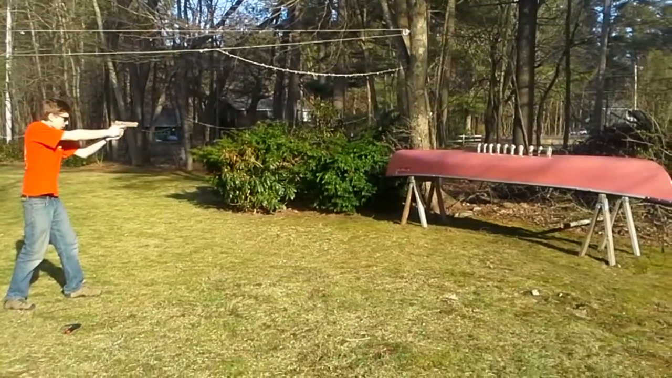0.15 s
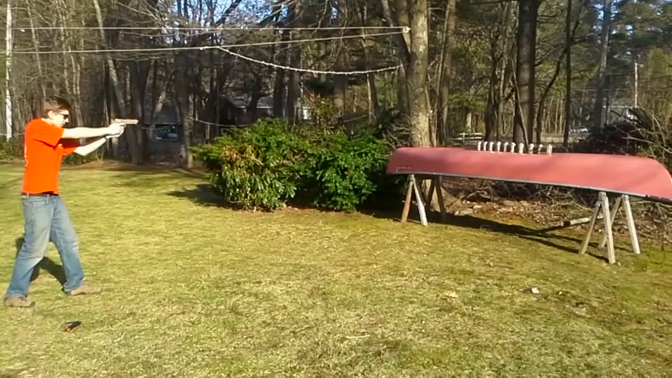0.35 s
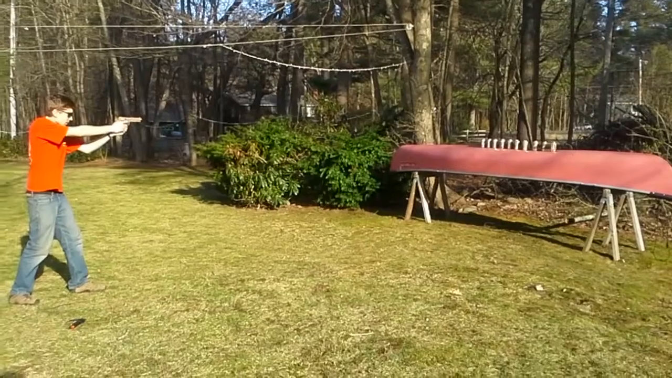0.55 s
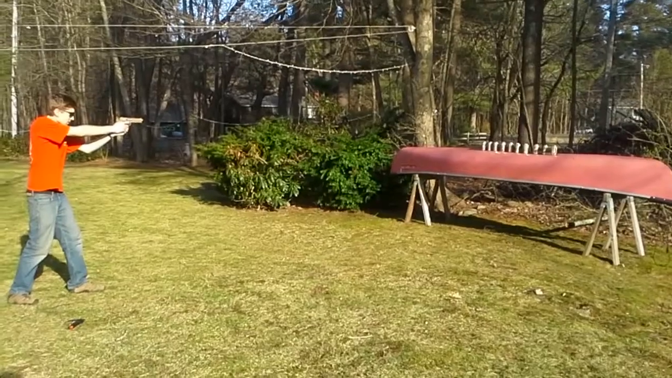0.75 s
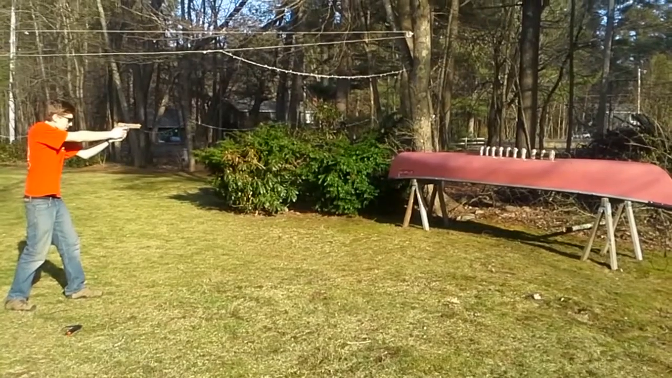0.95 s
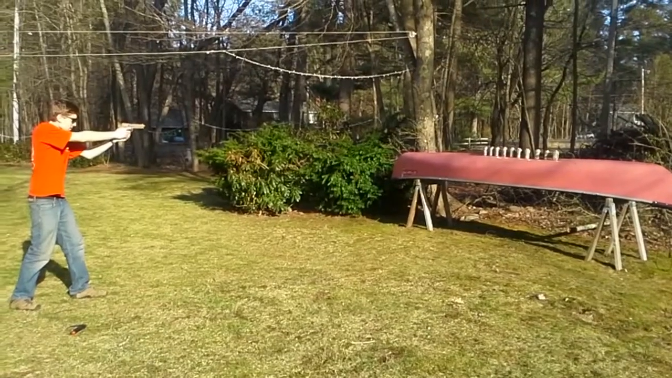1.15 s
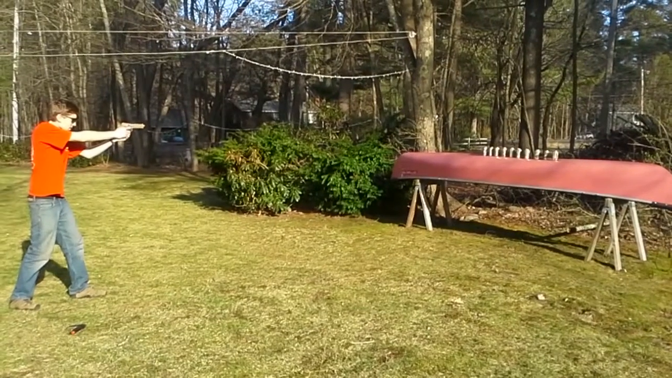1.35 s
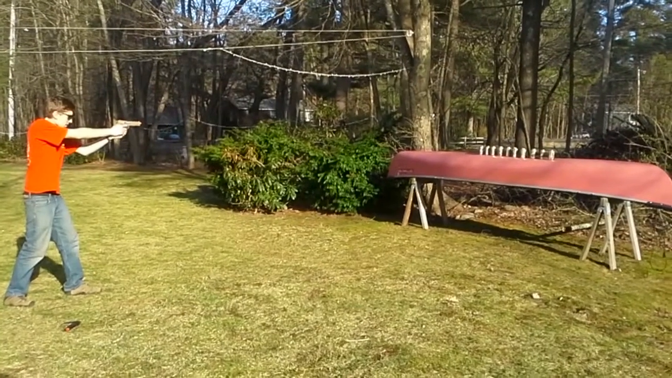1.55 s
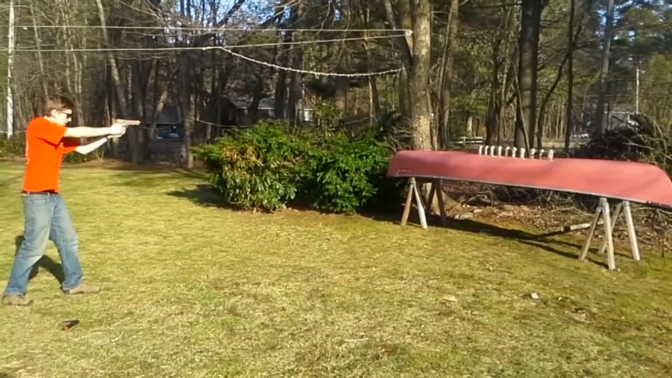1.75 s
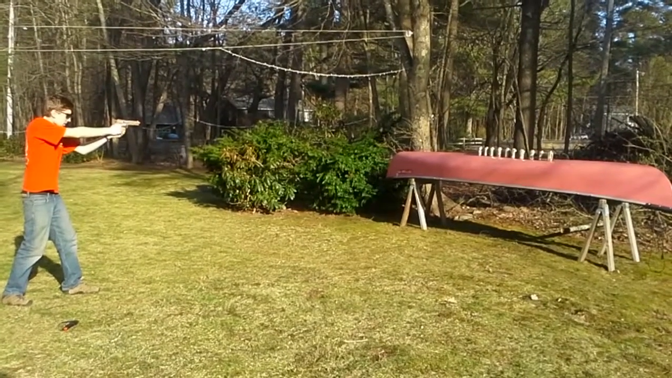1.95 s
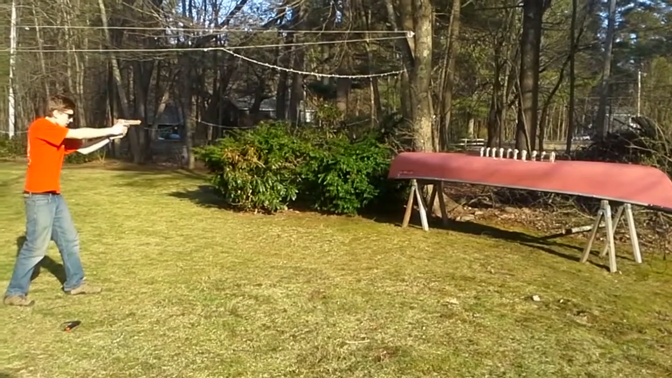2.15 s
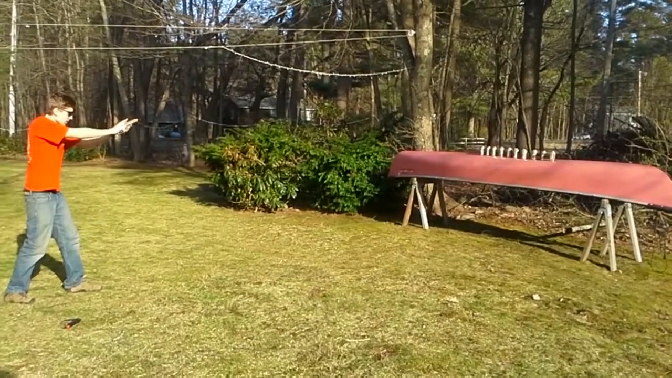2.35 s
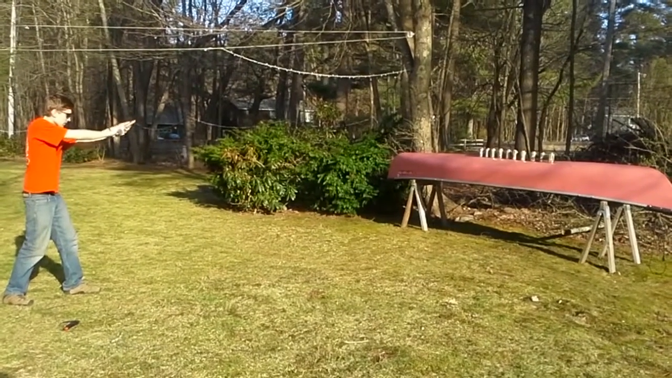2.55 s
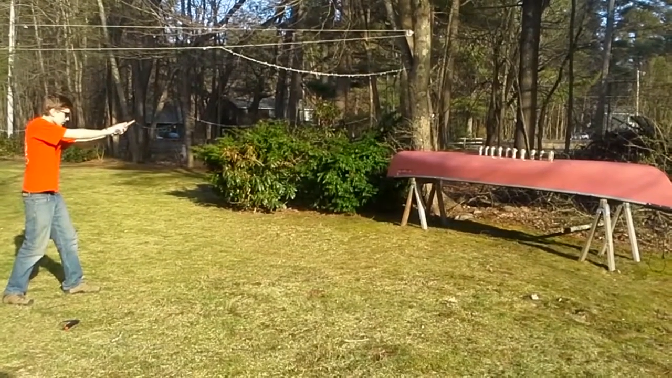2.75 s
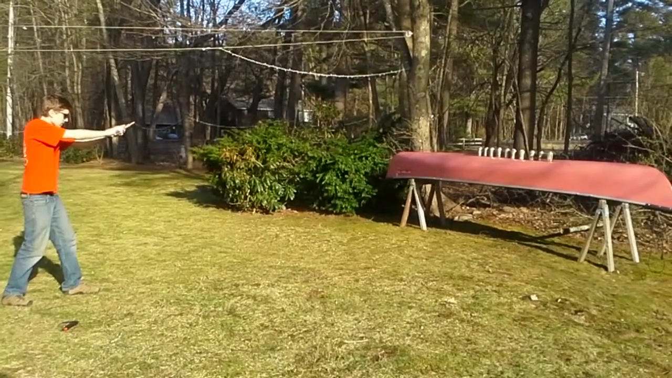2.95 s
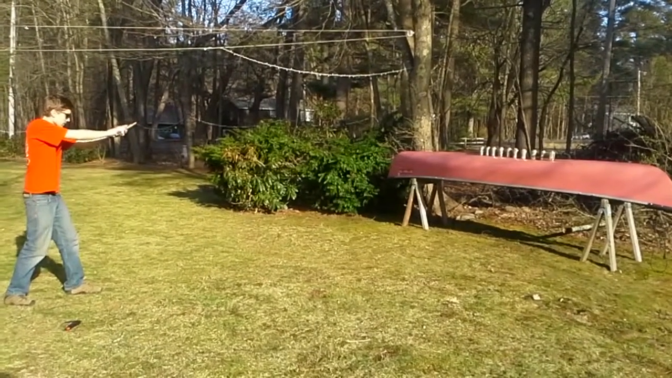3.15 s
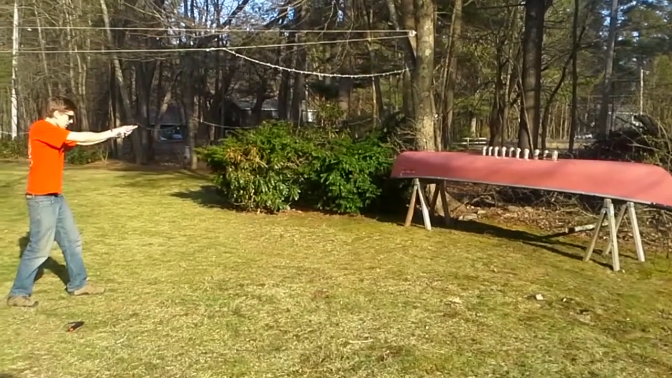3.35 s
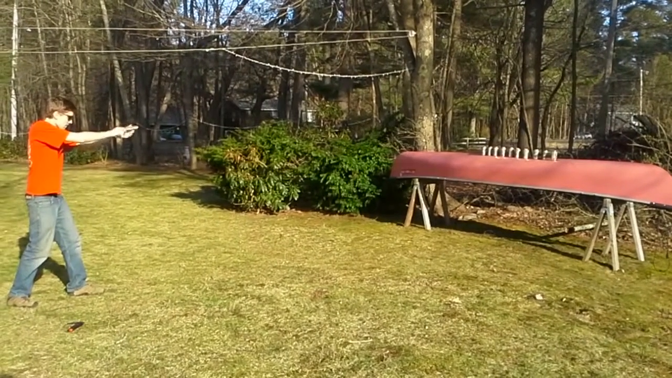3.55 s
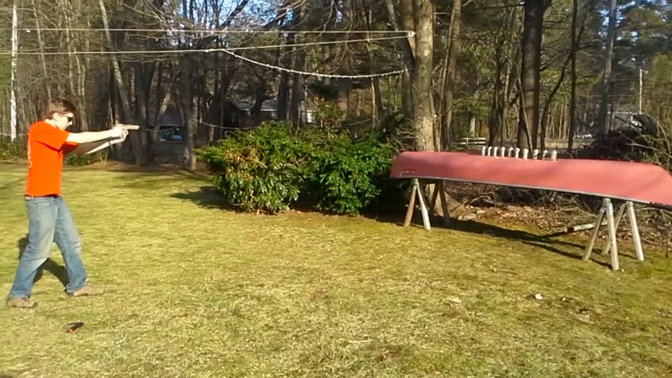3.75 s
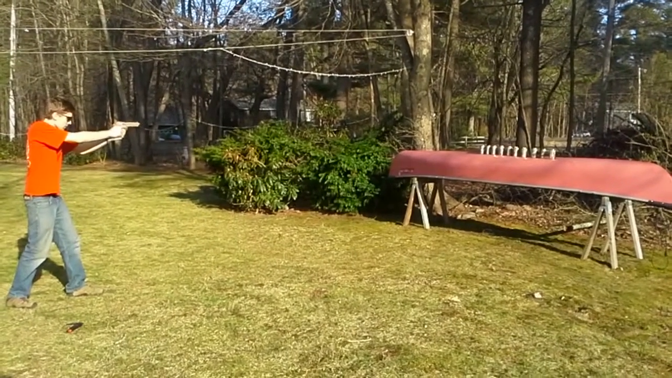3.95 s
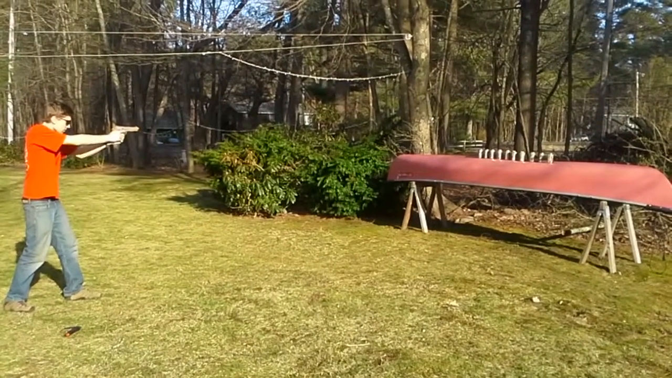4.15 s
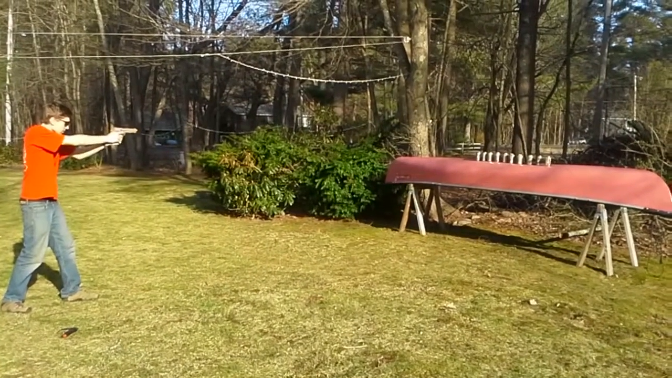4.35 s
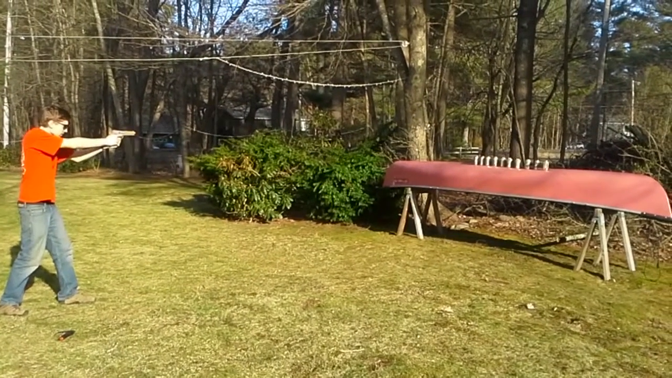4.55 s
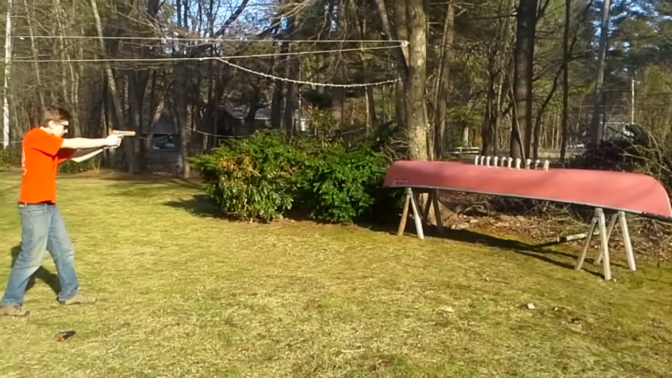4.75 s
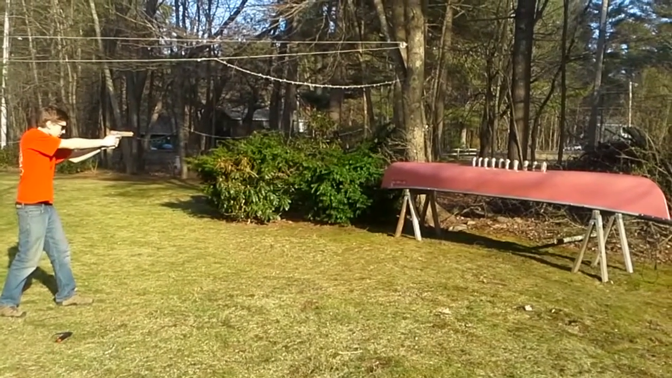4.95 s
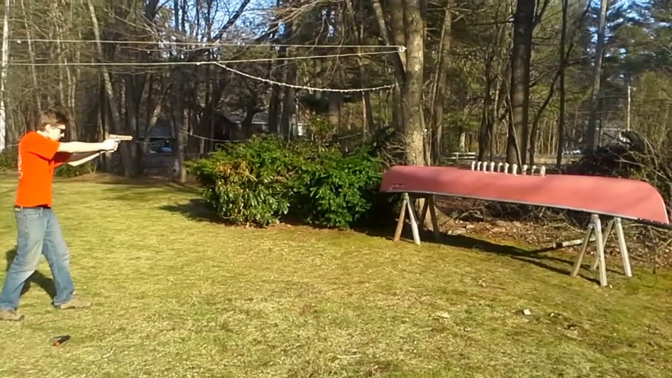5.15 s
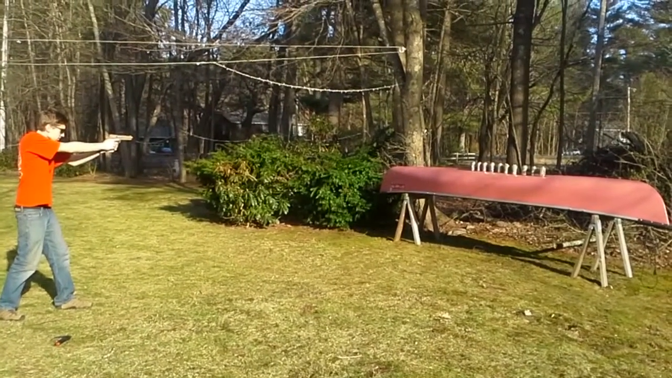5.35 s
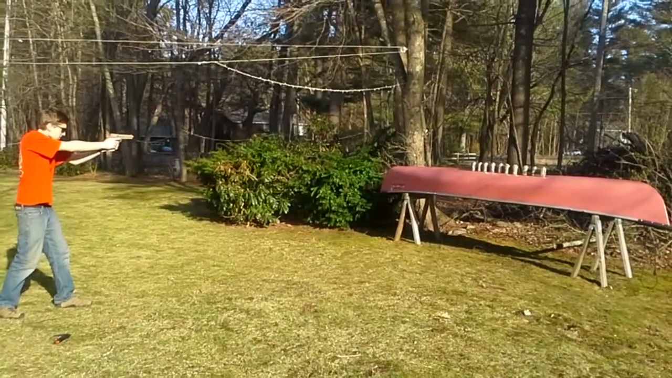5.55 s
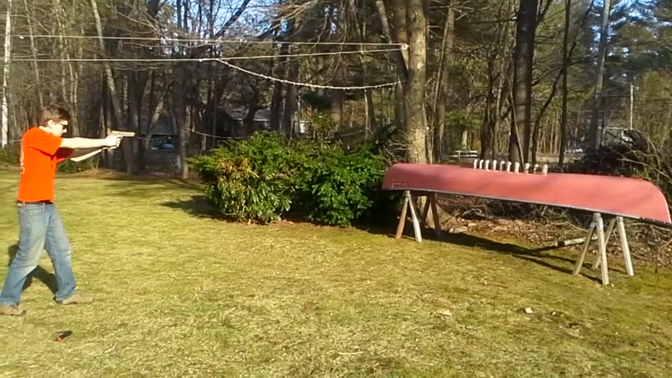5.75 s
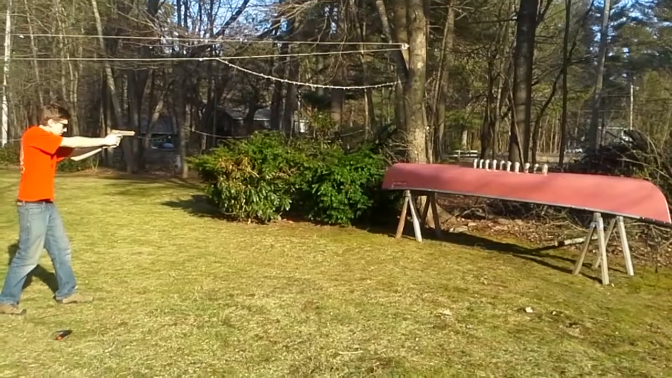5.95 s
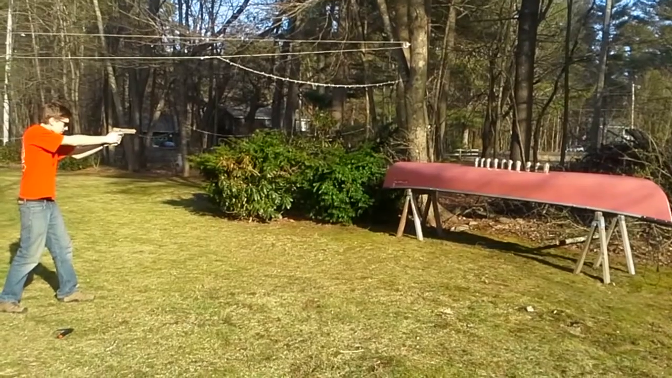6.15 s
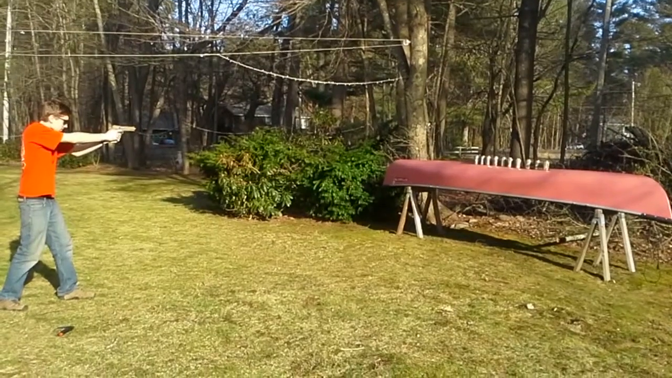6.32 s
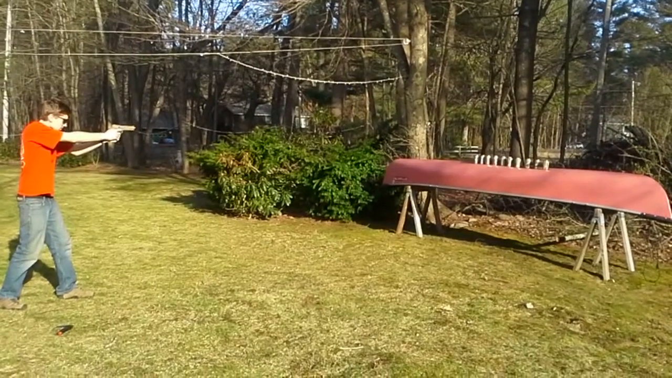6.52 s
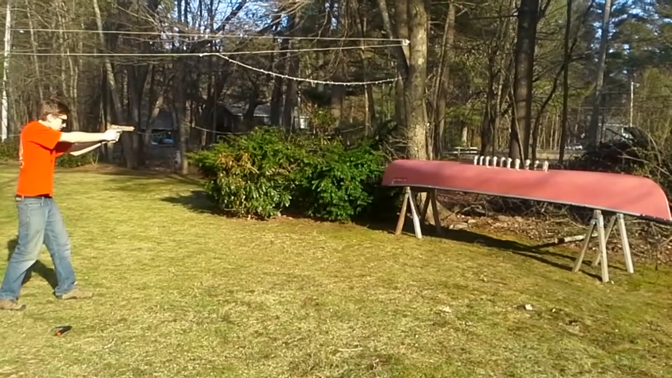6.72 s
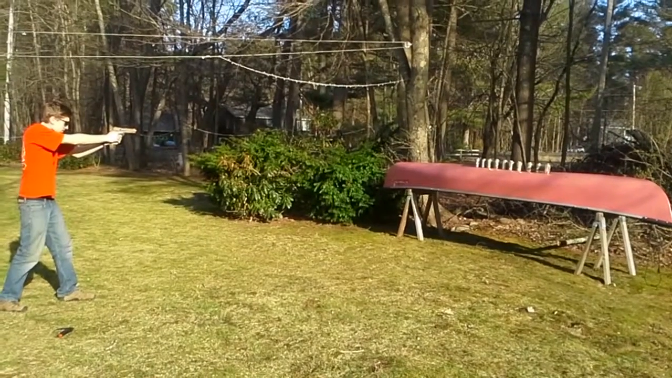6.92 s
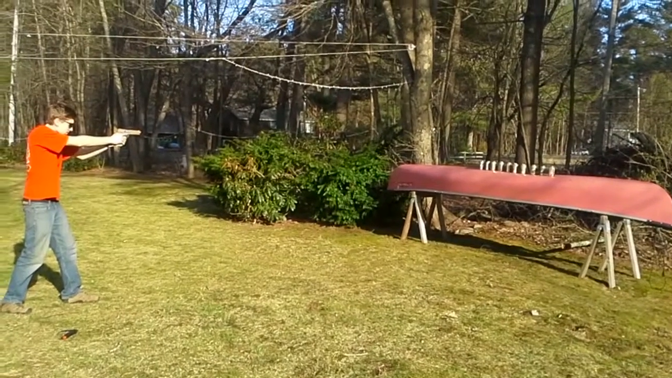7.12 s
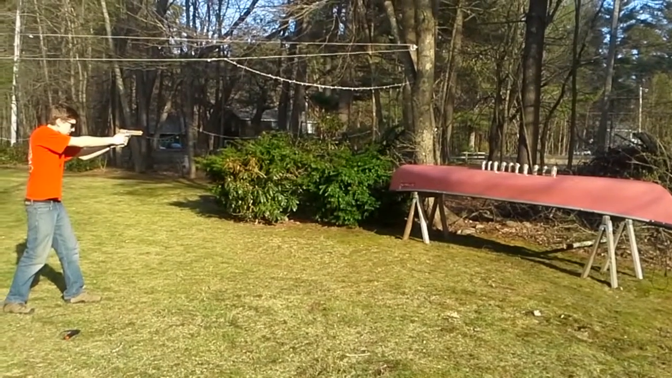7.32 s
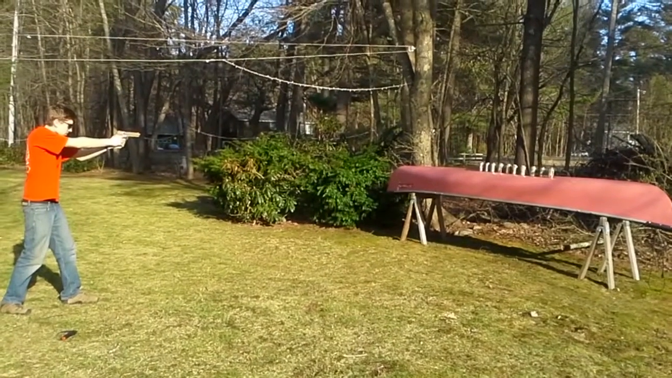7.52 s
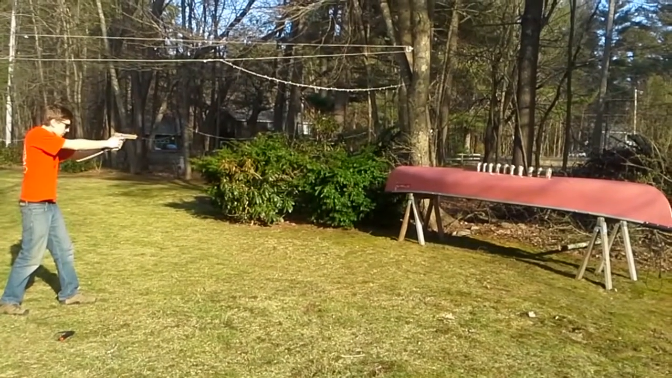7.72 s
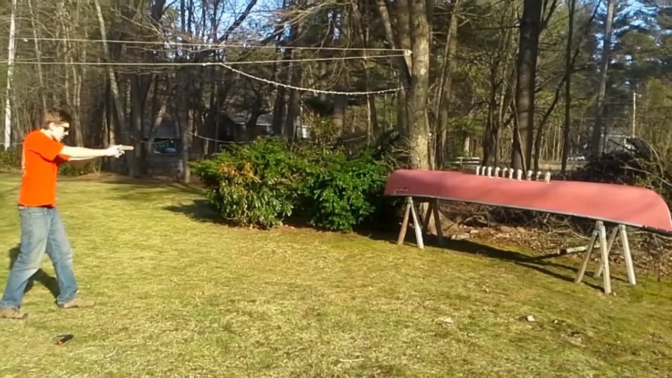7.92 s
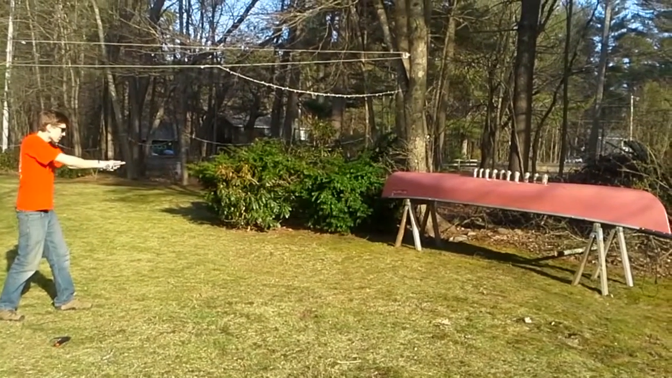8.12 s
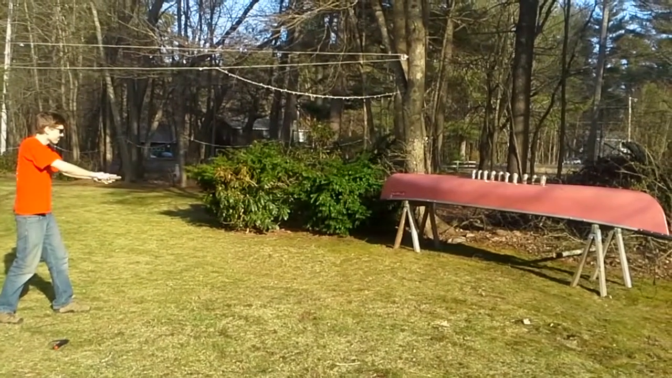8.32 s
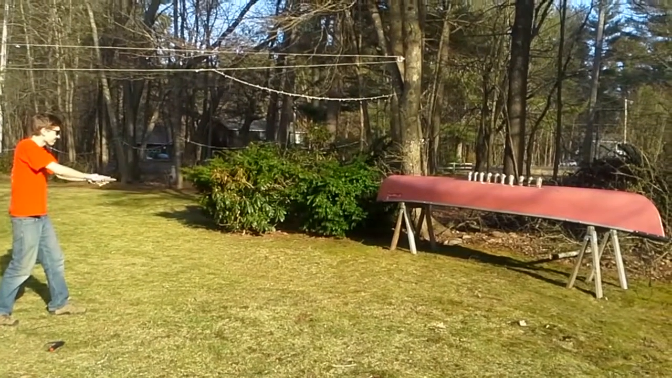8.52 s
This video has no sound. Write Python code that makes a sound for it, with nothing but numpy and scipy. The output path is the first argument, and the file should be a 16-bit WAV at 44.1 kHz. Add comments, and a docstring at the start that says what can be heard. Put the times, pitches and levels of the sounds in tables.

```python
"""A spring airsoft pistol pops twice in a yard; 0.1 s after each pop its pellet smacks an empty can.
Pops are decaying noise plus frame resonances; each can is a crack, shell noise, ringing modes and a thud.
Cocking clacks are noise bursts with short rings; trees scatter pops, smacks, clacks and birdsong as noise tails.
Finches twitter as gliding sines and a small mechanism ticks on the right as filtered clicks.
Behind them lie noise rumble, roar, rustle and hiss, and a far machine's sine hum and whine."""
import sys
import numpy as np
from scipy import signal
from scipy.fft import rfft, irfft, next_fast_len
from scipy.io import wavfile
from scipy.ndimage import map_coordinates

SR = 44100
rng = np.random.default_rng(int(sys.argv[2]) if len(sys.argv) > 2 else 0)


def wav_out(sig):
    """Save sig, one row per channel (or a flat mono array), as 16-bit PCM at SR to the path in sys.argv[1]."""
    wavfile.write(sys.argv[1], SR, np.round(np.clip(np.atleast_2d(sig).T, -1, 1) * 32767).astype(np.int16))


N = 378378
T = np.arange(SR) / SR  # the second after a blow

# piston stops: t/s, level/dB, left-right/dB (times SHADE_FACTOR)
SHOTS = [(1.506, -16.5, 7.5), (6.986, -16, 3.5)]
# air pop spectrum: f/Hz, density/dB per Hz
POP_SPECTRUM = [(60, -23.5), (200, -9), (750, -1.5), (1150, -3.5), (2100, -1.5), (2900, -4), (3700, -5),
                (5200, -7), (6900, 3.5), (9000, -7), (14500, -12.5)]
# hollow frame resonances: f/Hz, width/Hz, level/dB
FRAME_PEAKS = [(775, 94, -4), (2120, 203, -4.5), (2680, 260, -3.5), (4150, 160, -7), (5230, 240, -5),
               (6640, 150, -3), (8550, 240, -9)]
STROKE_S = 0.0052
POP_DB, POP_TAIL_DB, FRAME_DB, RUSH_DB = -6, -15, 3, -13  # re shot level
POP_T60_S, POP_TAIL_T60_S = 0.012, 0.06


def pistol():
    """The piston rushes down its cylinder, then slams home: a pop of air rings the hollow frame."""
    out = np.zeros((2, N))
    rush_gain = np.linspace(.4, 1, round(STROKE_S * SR))
    for s, db, pan_db in SHOTS:
        rush = rush_gain * noise(POP_SPECTRUM, 0.71, size=len(rush_gain))
        add(out, s - STROKE_S, amp(db + RUSH_DB) * rush)
        envelope = amp(POP_DB - 60 * T / POP_T60_S) + amp(POP_TAIL_DB - 60 * T / POP_TAIL_T60_S)
        pop = envelope * noise(POP_SPECTRUM, 0.44, size=SR)
        blow = pop + amp(FRAME_DB) * struck(FRAME_PEAKS, T)
        add(out, s, yard(amp(db) * placed(blow, 0.065, pan_db), wet_db=-11.5, build_s=0.0031))
    return out


# pellet strikes: t/s, then level/dB of crack, dent, rattle, rebound, shell clatter, ring, thud,
# then left-right/dB of crack and shell (times SHADE_FACTOR)
HITS = [(1.608, -16, -4, -13, -24, -23, -26, -59.5, 5), (7.0894, -15.5, -10, -36, -23.5, -19, -25, -36, 4)]
# ringing modes, first and second can: f/Hz, level/dB, t60/s
MODES_A = [(969, -17, 1.3), (1120, -25, 1.1), (2090, -12, 0.6), (2934, -17, .6), (3670, 3.5, 0.26),
           (3758, -4.5, .2), (4064, -7, .33), (4750, -7, 0.2), (5329, 0, 0.15), (5900, -12, .45),
           (6352, -6.5, .3), (6700, -4, .3), (7677, -10, .23)]
MODES_B = [(968.6, -13, 1.1), (998, -11.5, 1.0), (1024, -19, 1.3), (1120, -28.5, 1.5), (1620, -9.5, .2),
           (2090, -12.5, 0.34), (3080, 1.5, .34), (3180, -5, .36), (3510, -7.5, .44), (3607, -4, 0.31),
           (5350, -3.5, .25), (5636, -9, .33), (6020, -3.5, 0.2), (6514, -7, .35)]
# struck wall resonances, first and second can: f/Hz, width/Hz, level/dB
DENT_PEAKS_A = [(784, 410, -13), (1120, 560, -9.5), (3060, 310, -11.5), (3660, 140, -8), (5350, 53, -0.5),
                (6480, 200, -10.5), (8040, 180, -10)]
DENT_PEAKS_B = [(736, 95, -4), (944, 210, -13), (3080, 190, -10), (5404, 110, -4.5), (5860, 130, -3.5),
                (6560, 90, -1), (8520, 200, -6.5)]
# decay of the crowded shell modes, first and second can: f/Hz, t60/s
SHELL_DECAY_A = [(200, .37), (900, 0.2), (3000, 0.24), (6500, .29), (9000, 0.22), (13000, 0.55)]
SHELL_DECAY_B = [(200, 0.43), (900, 0.2), (3000, 0.37), (6500, .31), (9000, .22), (13000, 0.44)]
# spectrum of the crowded shell modes: f/Hz, density/dB per Hz
SHELL_SPECTRUM = [(100, -35), (450, -32.5), (780, -13), (1250, -16), (1900, -9), (2450, -8), (3100, -4.5),
                  (3800, -4.5), (4600, -9), (5700, -1), (6800, -2.5), (8700, -3.5), (10500, -14),
                  (14500, -18)]
# pellet contact spectrum: f/Hz, density/dB per Hz
CRACK_SPECTRUM = [(100, -36.5), (500, -12), (740, 1.5), (1000, -1), (1500, -4.5), (3200, -3.5), (4400, -4),
                  (6000, 4), (9000, -5), (11000, -12.5), (15000, -14)]
# spectrum of what the cans stand on: f/Hz, density/dB per Hz
THUD_SPECTRUM = [(60, -29.5), (150, -10), (210, 2), (320, -5.5), (480, -14), (740, -6), (1100, -28.5),
                 (1500, -48)]
CRACK_T60_S, RATTLE_T60_S, THUD_T60_S = 0.0026, 0.045, 0.55  # envelopes
REBOUND_S, REBOUND_T60_S = .021, 0.15  # pellet reaches the far wall; envelope of that rattle
SPIN_S = 2.2e-5  # rms travel-time waver of the spinning can
CAN_LAG_MS, RING_PAN_DB = -0.15, 3.9


def cans():
    """A pellet cracks and dents the thin wall; the shell rattles, strong modes ring, the stand thuds."""
    out = np.zeros((2, N))
    both_cans = [(MODES_A, DENT_PEAKS_A, SHELL_DECAY_A), (MODES_B, DENT_PEAKS_B, SHELL_DECAY_B)]
    for hit, (modes, dent_peaks, shell_decay) in zip(HITS, both_cans):
        s, crack_db, dent_db, rattle_db, rebound_db, shell_db, ring_db, thud_db, pan_db = hit
        crack = amp(crack_db - 60 * T / CRACK_T60_S) * noise(CRACK_SPECTRUM, 0.93, size=SR)
        dent = amp(dent_db) * (1 - np.exp(-T / 0.00071)) * struck(dent_peaks, T)
        # fast-dying rattle plus unevenly fluttering shell noise
        envelope = amp(rattle_db - 60 * T / RATTLE_T60_S) + amp(shell_db + 2.2 * wobble(130, size=SR))
        rebound = amp(rebound_db - 60 * np.abs(T - REBOUND_S) / REBOUND_T60_S)
        envelope += (T > REBOUND_S) * rebound
        shell = envelope * dying(noise(SHELL_SPECTRUM, 0.4, size=SR), shell_decay)
        smack = placed(crack + dent + shell, CAN_LAG_MS, pan_db)
        add(out, s, yard(smack, wet_db=-12.0, build_s=0.018))
        add(out, s, amp(ring_db) * placed(can_ring(modes), CAN_LAG_MS, RING_PAN_DB))
        thud_envelope = amp(thud_db - 60 * T / THUD_T60_S) * (1 - np.exp(-T / 0.041))
        add(out, s, thud_envelope * noise(THUD_SPECTRUM, 0.85, size=SR))
    return out


def can_ring(modes):
    """Decaying sines; spin wavers each one's travel time per side, so high modes waver most in phase."""
    ring = np.zeros((2, SR))
    for hz, db, t60 in modes:
        waver = np.array([wobble(60, size=SR), wobble(71, size=SR)])
        ring += amp(db - 60 * T / t60) * np.sin(2 * np.pi * hz * (T + SPIN_S * waver))
    return ring


# slide, trigger and tumbling can: t/s, level/dB, knock level/dB, knock f/Hz,
# rise/s (40 dB), t60/s, brightness/dB per octave
CLACKS = [(1.7222, -26.5, -26.5, 2400, .003, 0.02, 14), (1.8263, -28.5, -12.5, 2700, 0.00087, 0.015, 8),
          (2.846, -37.5, -5.5, 2400, .0018, 0.014, -4), (2.895, -51, -9.5, 4000, .008, .03, -1),
          (2.956, -29.5, -8.5, 1830, 0.004, 0.022, 1.5), (3.077, -52.5, 10, 447, 0.0014, 0.013, 0),
          (3.26, -57.5, -9, 1800, 0.033, .15, -1), (3.311, -38, -3.5, 1790, 0.017, 0.15, 3.5),
          (3.3223, -27.5, -3, 1130, 0.0028, 0.022, 2), (3.5078, -57.5, 3.5, 1203, .0016, 0.017, 1.5),
          (7.598, -48, -6, 2416, .0009, 0.019, 6)]
# hard contact spectrum before brightening: f/Hz, density/dB per Hz
SNAP_SPECTRUM = [(800, -25.5), (1900, -20), (2700, -3.5), (3400, -11), (4400, 3), (6100, 3), (8500, 0.5),
                 (14500, -14)]
# hollow knock spectrum: f/multiple of knock f, density/dB per Hz
KNOCK_SPECTRUM = [(.15, -18.5), (.7, -13), (1, -7), (1.3, -8), (2.1, -11.5), (3, -15), (8, -27.5)]
# slide resonances: f/Hz, width/Hz, level/dB
SLIDE_PEAKS = [(2480, 200, -9.5), (4280, 170, -3), (5180, 260, -5), (5950, 260, -0.5), (6740, 300, 4.5)]
LEAD_S = .03
KNOCK_RING_DB, KNOCK_T60_S = -1.5, 0.022  # re knock
SLIDE_DB = 7  # re clack level


def clacks():
    """Parts scrape up to a hard stop: a bright snap and a short ring over a hollow knock."""
    out = np.zeros((2, N))
    t = T[:SR // 8] - LEAD_S
    for s, db, knock_db, knock_hz, rise_s, t60, bright_db in CLACKS:
        knock_spectrum = [(multiple * knock_hz, level) for multiple, level in KNOCK_SPECTRUM]
        snap = noise(tilted(SNAP_SPECTRUM, bright_db), 0.98, size=len(t))
        knock = amp(knock_db) * noise(knock_spectrum, 0.097, size=len(t))
        envelope = amp(db - np.where(t < 0, -40 * t / rise_s, 60 * t / t60))
        ring_envelope = (t > 0) * amp(db + knock_db + KNOCK_RING_DB - 60 * np.abs(t) / KNOCK_T60_S)
        ring = ring_envelope * np.sin(2 * np.pi * knock_hz * t)
        slide = amp(db + SLIDE_DB) * np.clip(t / 0.00076, 0, 1) * struck(SLIDE_PEAKS, t)
        add(out, s - LEAD_S, placed(envelope * (snap + knock) + ring + slide, 0.049, 3.5))
    return yard(out, wet_db=-12.5, build_s=0.0022)


# finch phrases: start t/s, end t/s, period/s, slowing/s per repeat, chirp level/dB, tweet level/dB,
# growth/dB per repeat, chirp end f/Hz, buzz/0-1
SONGS = [(0.514, 1.3, 0.222, .021, -55.5, -63, -1, 4835, .75),
         (4.519, 5.5, 0.284, -0.001, -66, -69, 1.36, 4993, 0.7),
         (5.607, 6.55, .21, -.003, -57.5, -65.5, 0.56, 4150, 0.42)]
# short rising flicks: t/s, level/dB
FLICKS = [(1.432, -60), (4.462, -63.5), (5.253, -60.5), (6.55, -58.5), (7.945, -55)]
# slurred whistles, and one faint, nearly level echo of birdsong (at 4.984 s):
# t/s, length/s, start f/Hz, end f/Hz, level/dB
WHISTLES_AND_ECHO = [(.052, 0.052, 4750, 3450, -63.5), (0.099, .04, 6650, 5560, -62),
                     (0.11, .06, 4450, 6690, -57.5), (0.232, .095, 3380, 5000, -62.5),
                     (0.305, .13, 3450, 3980, -68.5), (.92, .06, 5210, 5330, -64.5),
                     (1.04, .1, 5120, 5250, -69), (1.364, .055, 4650, 5150, -67.5),
                     (2.781, .065, 4855, 3280, -70), (4.984, 0.16, 3660, 3566, -77.5),
                     (6.656, .045, 6100, 5424, -61.5), (6.783, .062, 2900, 4110, -66.5),
                     (6.897, 0.051, 5050, 5600, -61.5), (7.384, 0.035, 5300, 5625, -58.5),
                     (7.659, .15, 5012, 5400, -69), (7.809, 0.055, 5350, 5950, -73),
                     (7.804, 0.095, 3560, 4120, -69.5), (7.902, 0.09, 4200, 5063, -70),
                     (8.044, 0.05, 6696, 8000, -66.5), (8.332, .15, 3730, 4860, -78),
                     (8.49, .09, 5250, 6430, -74.5)]
CHIRP_S, CHIRP_FROM_HZ = 0.05, 7400
TWEET_S, TWEET_FROM_HZ, TWEET_MEAN_TO_HZ = .058, 2720, 4200
TWEET_AT = .305  # share of the period
SLURS_START_S, SLURS_END_S, SLUR_GAP_S = 5.465, 6.85, .255
SLUR_S, SLUR_FROM_HZ, SLUR_TO_HZ, SLUR_DB = 0.073, 6900, 5250, -64.5
FLICK_S, FLICK_FROM_HZ, FLICK_TO_HZ = 0.026, 6200, 7600


def birds():
    """Finches in the trees to the left: gliding sines for chirps, tweets, slurs, flicks, whistles, an echo."""
    out = np.zeros((2, N))
    for start, end, period, slowing, chirp_db, tweet_db, growth_db, end_hz, buzz in SONGS:
        for k, beat in enumerate(np.arange(start, end, period)):
            s = beat + slowing * k * (k - 1) / 2
            chirp = note(CHIRP_S, CHIRP_FROM_HZ, end_hz, buzz, bend=1.6)
            add(out, s, amp(chirp_db + growth_db * k) * chirp)
            tweet_to_hz = TWEET_MEAN_TO_HZ * rng.normal(1, .014)
            tweet = note(TWEET_S, TWEET_FROM_HZ, tweet_to_hz, buzz=.1, bend=rng.uniform(1, 1.3), late=.5)
            add(out, s + TWEET_AT * (period + slowing * k), amp(tweet_db + growth_db * k) * tweet)
    # a second finch's evenly spaced falling slurs
    for s in np.arange(SLURS_START_S, SLURS_END_S, SLUR_GAP_S):
        add(out, s, amp(SLUR_DB) * note(SLUR_S, SLUR_FROM_HZ, SLUR_TO_HZ, buzz=0.38))
    for s, db in FLICKS:
        add(out, s, amp(db) * note(FLICK_S, FLICK_FROM_HZ, FLICK_TO_HZ, bend=1.4))
    for s, length, start_hz, end_hz, db in WHISTLES_AND_ECHO:
        add(out, s, amp(db) * note(length, start_hz, end_hz, bend=1.3))
    return yard(amp([[2], [-10]]) * placed(out, -.34, 0), wet_db=-3.5, build_s=0.0024)


def note(length, start_hz, end_hz, buzz=0, bend=1.9, waver_hz=30, late=0):
    """A sine glide, levelling if bend > 1; late skews the swell to the end, fast pitch flutter buzzes."""
    u = np.linspace(0, 1, round(length * SR))
    hz = end_hz + (start_hz - end_hz) * (1 - u) ** bend
    hz = hz + buzz * 520 * wobble(1100, size=len(u)) + waver_hz * wobble(120, size=len(u))
    envelope = u ** late * np.sin(np.pi * u) ** (2 / 3)
    return unit(envelope * np.sin(2 * np.pi * np.cumsum(hz) / SR))


# even tick runs: start t/s, end t/s
TICK_RUNS = [(.112, 1.18), (2.876, 4.77), (4.825, 5.9), (5.946, 7.0), (7.385, 8.46)]
# clear ticks out of step: t/s
ODD_TICKS = [0.065, 0.814, 1.241, 1.412, 1.948, 2.162, 2.458, 2.695, 2.763, 3.976, 5.102, 5.255]
# mechanism response: f/Hz, gain/dB
TICK_RESPONSE = [(1800, -23), (2800, 0), (4700, -3), (5700, -10.5), (6900, -2.5), (8000, 5.5), (9800, -10),
                 (11400, -3), (12800, -9), (14200, -5.5)]
TICK_GAP_S, STRAYS_PER_S = .1023, 0.8
TICK_DB, STRAY_DB = -32.5, -39  # mean, before TICK_RESPONSE


def ticks():
    """A small mechanism ticks nearly ten times a second, louder right: filtered clicks, random strays."""
    blows, t = np.zeros((2, N)), T[:SR // 200]
    steady = [s for start, end in TICK_RUNS for s in np.arange(start, end, TICK_GAP_S)]
    strays = rng.uniform(0, N / SR, round(STRAYS_PER_S * N / SR))
    for times, db in [(steady + ODD_TICKS, TICK_DB), (strays, STRAY_DB)]:
        for s in times:
            chatter = amp(-8.0 - 60 * t / 0.005) * rng.standard_normal((2, len(t)))
            contact = (t == 0) + chatter
            add(blows, s, amp(db + rng.normal(0, 0.65)) * contact)
    return filtered(blows, lambda hz: amp(along(TICK_RESPONSE, hz))) * amp([[-9], [0]])


# rumble level before RUMBLE_GAIN_DB: t/s, level/dB
RUMBLE_LEVEL = [(0.0, -61.5), (0.81, -66), (1.58, -66), (1.89, -60), (2.53, -71), (3.01, -65.5),
                (4.49, -79), (4.99, -74), (5.69, -64), (5.97, -71), (7.55, -64.5), (7.93, -67.5),
                (8.58, -73)]
# low rumble spectrum: f/Hz, density/dB per Hz
RUMBLE_SPECTRUM = [(15, -15), (35, -8), (60, -2), (90, -1), (150, -9.5), (400, -36)]
# far roar spectrum: f/Hz, density/dB per Hz
ROAR_SPECTRUM = [(60, -14.5), (110, -2.5), (170, -0.5), (260, -3), (420, -5.5), (900, -6.5), (1250, -18),
                 (2000, -40), (4000, -45)]
# far machine's hum: f/Hz, mean level/dB
HUM = [(96, -72), (119.8, -64.5), (145.3, -72)]
# faint distant tone: t/s, length/s, level/dB
WHINE = [(.9, 0.32, -76), (1.95, 0.72, -73), (3.331, 0.31, -72), (4.1, 0.55, -74.5)]
# branch rustle spectrum: f/Hz, density/dB per Hz
RUSTLE_SPECTRUM = [(700, -3.5), (1500, 4), (2500, -10.5), (4000, -1), (6000, -2.5), (8500, -9),
                   (14000, -28.5)]
# hiss spectrum: f/Hz, density/dB per Hz
HISS_SPECTRUM = [(1000, -0.5), (3000, 2.5), (7000, -0.5), (10000, -0.5), (14500, 0)]
RUMBLE_GAIN_DB, ROAR_DB, HISS_DB, WHINE_HZ = 4, -64, -69, 506


def air():
    """Noise rumble, roar, rustle and hiss; wavering sine hum and whine."""
    t = np.arange(N) / SR
    breeze_db = breeze(t)
    rumble_db = np.interp(t, *np.transpose(RUMBLE_LEVEL)) + RUMBLE_GAIN_DB + wobble(5.9)
    rumble = amp(rumble_db) * noise(RUMBLE_SPECTRUM, 0.63)
    # the wood's roar swells slightly with the breeze
    roar_db = ROAR_DB + 0.22 * (breeze_db - breeze_db.mean())
    roar = amp(roar_db) * noise(ROAR_SPECTRUM, 0.56)
    far = rumble + roar
    for hz, db in HUM:
        tone = unit(np.sin(2 * np.pi * hz * t + 0.5 * wobble(6.2)))
        far = far + amp(db + 0.62 * wobble(4.7)) * tone
    for s, length, db in WHINE:
        add(far, s, amp(db) * note(length, WHINE_HZ, WHINE_HZ, waver_hz=8.9))
    rustle = placed(amp(breeze_db) * noise(RUSTLE_SPECTRUM, 0.26), -.34, 2.0)
    return far * amp([[-1], [1]]) + rustle + amp(HISS_DB) * noise(HISS_SPECTRUM, 0)


# gusts in the branches: peak t/s, width/s, level/dB
GUSTS = [(.05, 0.24, -59), (1.05, 0.84, -71), (3.35, 0.14, -62.5), (6.4, 0.41, -65)]
CALM_DB = -73.5


def breeze(t):
    """Branch level in dB: Gaussian gusts add in power to the calm."""
    gusts = sum(amp(db) ** 2 * np.exp(-((t - s) / width) ** 2) for s, width, db in GUSTS)
    return 10 * np.log10(amp(CALM_DB) ** 2 + gusts)


# scatter decay among the trees: f/Hz, t60/s
TREE_DECAY = [(150, 1), (900, 0.93), (2500, 0.84), (6000, 0.51), (9000, 0.36), (13000, 0.43)]


def yard(x, wet_db, build_s):
    """Sound plus scatter from trunks and bushes: a decaying noise tail, independent per side."""
    tail = dying(rng.standard_normal((2, SR)), TREE_DECAY) * (1 - np.exp(-T / build_s))
    # single trunks and clumps of trees stand out
    trunks_db = 2.2 * np.array([wobble(350, size=SR), wobble(350, size=SR)])
    clumps_db = 1.3 * wobble(45, size=SR)
    tail = tail * amp(trunks_db + clumps_db)
    tail = amp(wet_db) * tail / np.linalg.norm(tail[0])
    scatter = signal.fftconvolve(x.astype(np.float32), tail.astype(np.float32), axes=1)
    return x + scatter[:, :x.shape[1]]


# factor on the left-right difference at each pitch; negative swaps the sides: f/Hz, factor
SHADE_FACTOR = [(450, -0.6), (1000, -0.05), (2450, 0.35), (3080, 2.5), (3550, 0.47), (4600, 0.4), (6000, 2),
                (8000, 0.65), (12000, 0.04)]


def placed(x, lag_ms, pan_db):
    """Places a source by a lag and a frequency-dependent level difference between the sides."""
    sides = np.array([[.5], [-.5]])

    def response(hz):
        level = amp(sides * pan_db * along(SHADE_FACTOR, hz))
        return level * np.exp(-2j * np.pi * hz * sides * lag_ms / 1000)

    return filtered(x, response)


def struck(peaks, t):
    """A blow at t = 0 rings broad resonances, wider ones shorter, slightly different per side."""
    t = np.maximum(t, 0)
    sizes = np.array([amp(db) * width for hz, width, db in peaks])
    ring = 0
    for k, (hz, width, db) in enumerate(peaks):
        gain = (-1) ** k * sizes[k] * amp(rng.normal(0, 1.5, (2, 1)))
        side_hz = hz + width * rng.normal(0, 0.21, (2, 1))
        ring = ring + gain * np.exp(-np.pi * width * t) * np.sin(2 * np.pi * side_hz * t)
    return ring / np.linalg.norm(sizes)


def dying(x, t60s):
    """Decays each frequency of a one-second sound at its own rate."""
    hz, t, z = signal.stft(x, SR, nperseg=256)
    decay = amp(-60 * t / along(t60s, hz)[:, None])
    return signal.istft(z * decay, SR, nperseg=256)[1][:, :SR]


def noise(spectrum, alike, size=N):
    """Coloured stereo noise, rms 1; alike is the power share common to both sides."""
    common, *own = rng.standard_normal((3, size))
    share = np.clip(alike, 0, 1)
    white = np.sqrt(share) * common + np.sqrt(1 - share) * np.array(own)
    return unit(filtered(white, lambda hz: amp(along(spectrum, hz))))


def tilted(spectrum, tilt_db):
    """Tilts a spectrum in dB per octave about 6 kHz."""
    return [(hz, db + tilt_db * np.log2(hz / 6000)) for hz, db in spectrum]


def filtered(x, response):
    """Applies a frequency response by FFT."""
    m = next_fast_len(x.shape[-1] + 2048, True)
    gain = response(np.fft.rfftfreq(m, 1 / SR)).astype(np.complex64)
    return irfft(rfft(x.astype(np.float32), m) * gain, m)[..., :x.shape[-1]]


def wobble(rate, size=N):
    """A smooth random curve through normal knots, rate knots per second."""
    knots = rng.standard_normal(int(size * rate / SR) + 4)
    grid = np.arange(len(knots) * 10) / 10
    return np.interp(np.arange(size) * rate / SR, grid, map_coordinates(knots, [grid]))


def along(points, hz):
    """Interpolates (f/Hz, value) points on a log frequency axis."""
    f, v = np.transpose(points)
    return np.interp(np.log(hz + 1), np.log(f + 1), v)


def amp(db):
    """Amplitude of a dB level."""
    return 10 ** (np.asarray(db) / 20)


def unit(x):
    """Scales to rms 1."""
    return x / np.sqrt(np.mean(x ** 2) + 1e-20)


def add(track, s, sound):
    """Mixes a sound into the track at s seconds."""
    part = track[:, max(round(s * SR), 0):][:, :sound.shape[-1]]
    part += sound[..., :part.shape[1]]


def scene():
    """Sums all sources in the yard."""
    return pistol() + cans() + clacks() + birds() + ticks() + air()


TOP_HZ = 14600


def record(dry):
    """Rounds off the highest peaks, then low-passes steeply at TOP_HZ."""
    rounded = dry / (1 + np.abs(dry / .9) ** 6) ** (1 / 6)
    return filtered(rounded, lambda hz: 1 / np.sqrt(1 + (hz / TOP_HZ) ** 120))


dry = scene()
out = record(dry)
wav_out(out)
```